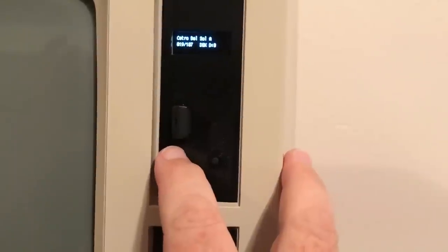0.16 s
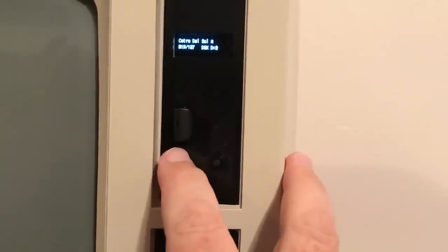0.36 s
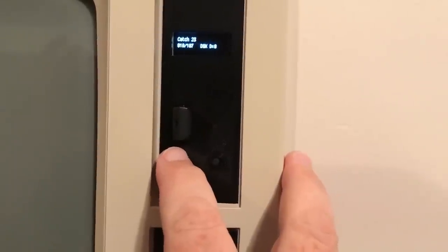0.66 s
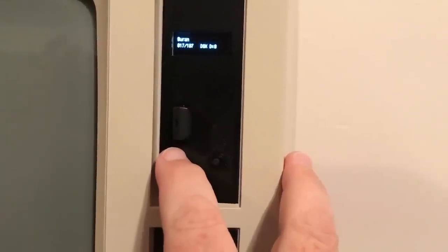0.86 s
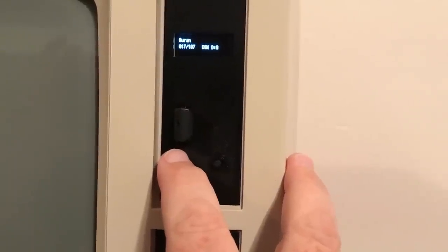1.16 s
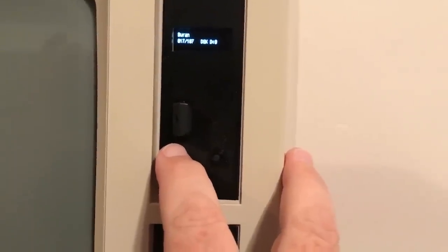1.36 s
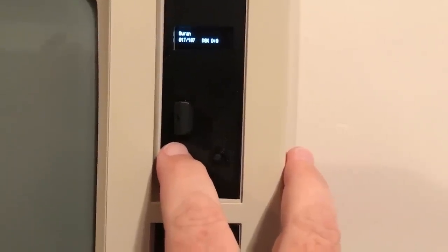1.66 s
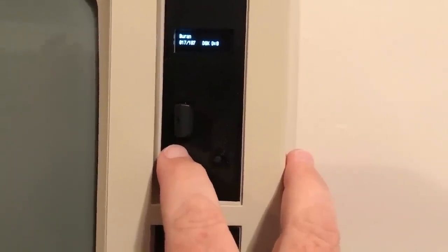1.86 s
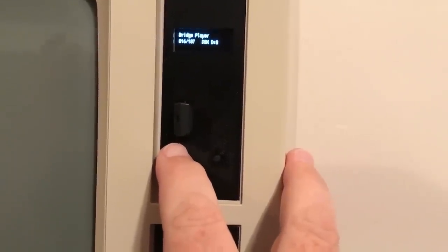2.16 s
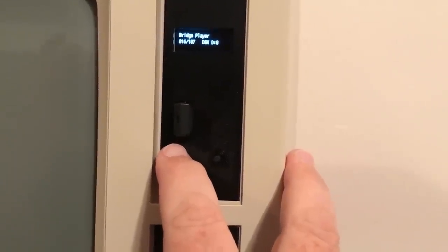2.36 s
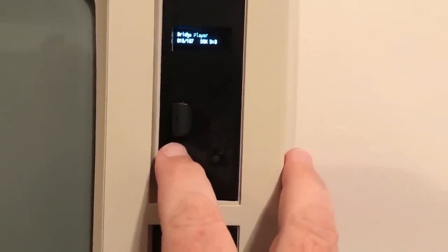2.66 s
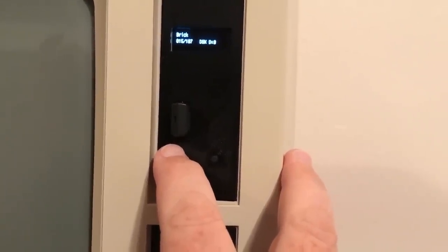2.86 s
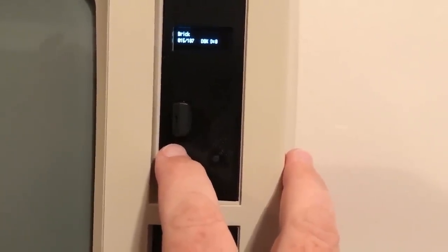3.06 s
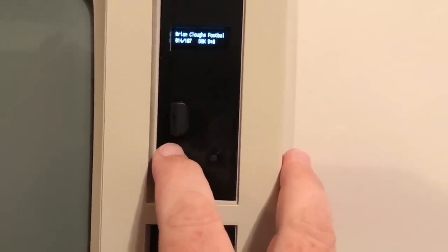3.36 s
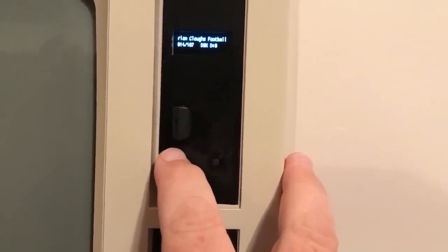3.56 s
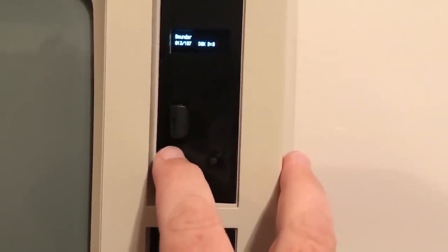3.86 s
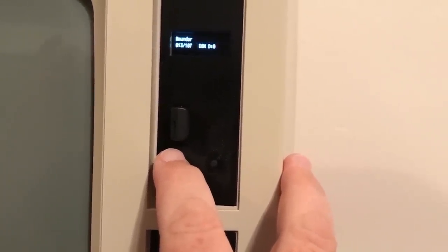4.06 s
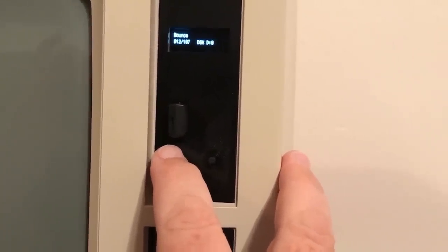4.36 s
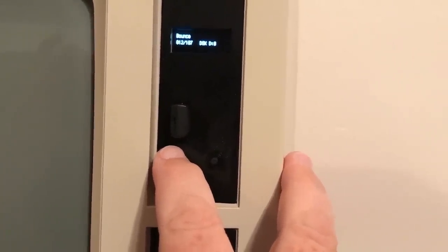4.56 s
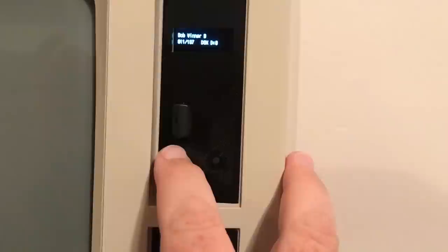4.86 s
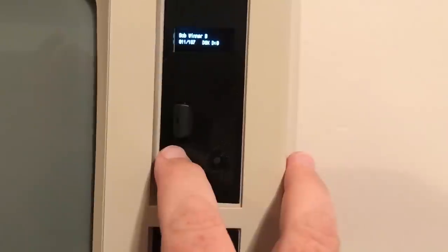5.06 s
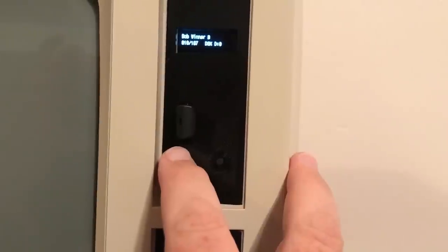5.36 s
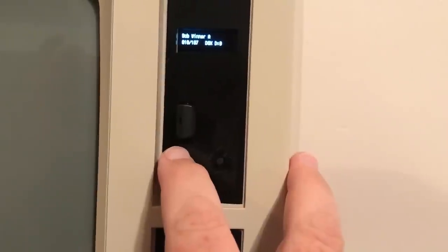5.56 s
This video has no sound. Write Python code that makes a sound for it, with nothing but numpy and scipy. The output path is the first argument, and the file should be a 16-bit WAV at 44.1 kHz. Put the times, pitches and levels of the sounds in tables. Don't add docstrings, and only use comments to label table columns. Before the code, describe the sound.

Crisp paired button clicks knock a hollow plastic panel, with irregular pauses, above soft rumble, faint hiss and a very high steady whine.

```python
import sys
import numpy as np
from scipy import signal
from scipy.fft import rfft, irfft
from scipy.io import wavfile
from scipy.ndimage import uniform_filter1d

SR = 44100
rng = np.random.default_rng(int(sys.argv[2]) if len(sys.argv) > 2 else 0)


def decibels_to_gain(level_db):
    exponent = np.asarray(level_db, float) / 20
    return 10 ** exponent


def wav_record(signal):
    frames = np.transpose(np.atleast_2d(signal))
    bounded = np.clip(frames, -1, 1)
    quanta = np.round(bounded * 32767).astype(np.int16)
    wavfile.write(sys.argv[1], SR, quanta)


N = 251811


def curve(table):
    return np.interp(np.arange(N) / SR, *np.transpose(table))


def colour(x, points):
    hz, db = np.transpose(points)
    bins = np.fft.rfftfreq(x.shape[-1], 1 / SR) + 1
    gain = decibels_to_gain(np.interp(np.log(bins), np.log(hz), db))
    return irfft(rfft(x) * gain, x.shape[-1])


def fade(t, t60):
    return 1000. ** (-t / np.maximum(t60, 1e-3))


def walk(rate):
    hold = int(SR / rate)
    steps = np.repeat(rng.standard_normal(N // hold + 1), hold)
    return 1.38 * uniform_filter1d(uniform_filter1d(steps, hold), hold)[:N]


def hiss(shape):
    noise = colour(rng.standard_normal(N), shape)
    return noise / np.std(noise)


# (frequency [Hz], level [dB per Hz])
RUMBLE_COLOUR = [(12, -81), (20, -52), (36, -14), (76, 0), (107, -5.5), (140, -3), (179, -9), (199, -35),
                 (231, -20), (260, -24.5), (340, -59), (570, -120)]
# (frequency [Hz], level [dB per Hz])
AIR_COLOUR = [(120, -23), (200, 1), (230, -1.5), (365, -3.5), (421, -9), (700, -8), (929, -10.5),
              (1010, -7.5), (1190, -10), (1900, -18), (2470, -38), (4180, -120)]
# (frequency [Hz], level [dB])
HISS_COLOUR = [(1500, -32), (1900, -6.5), (2350, -1), (3200, 2), (3700, -1), (4400, -4), (5300, -2),
               (6500, -7), (7200, -4), (8200, -8.5), (9300, -4.5), (10400, -13.5), (11400, -8),
               (15200, -6.5)]
RUMBLE_DB, AIR_DB, HISS_DB = -44, -55, -61
FAN_HZ = 84.24
FAN_PEAK_DB, FAN_PEAK_S, FAN_RISE_DB_S, FAN_FALL_DB_S = -44.5, 1.2, 5, 5


def floor():
    since = np.arange(N) / SR - FAN_PEAK_S
    swell_db = FAN_PEAK_DB + np.minimum(FAN_RISE_DB_S * since, -FAN_FALL_DB_S * since)
    fan = hiss([(0.84 * FAN_HZ, -90), (FAN_HZ, 0), (1.2 * FAN_HZ, -90)]) * decibels_to_gain(swell_db)
    rumble = hiss(RUMBLE_COLOUR) * decibels_to_gain(RUMBLE_DB + 0.26 * walk(4.1))
    air = hiss(AIR_COLOUR) * decibels_to_gain(AIR_DB)
    low_air = signal.sosfiltfilt(signal.butter(4, 600, fs=SR, output="sos"), air)
    high_air = air - low_air
    flicker = low_air * decibels_to_gain(1.9 * walk(4.1)) + high_air * decibels_to_gain(0.7 * walk(5.14))
    return fan + rumble + flicker + hiss(HISS_COLOUR) * decibels_to_gain(HISS_DB)


# (time [s], level [dB])
WHINE_SWAY = [(0.0, -46), (0.32, -44.5), (1.57, -48), (3.16, -46), (3.2, -44), (3.69, -50.5), (3.8, -46),
              (4.01, -52), (4.17, -52), (4.33, -46), (4.58, -45.5), (4.69, -48), (4.8, -44), (5.68, -43.5),
              (5.71, -46)]
# (frequency [Hz], level [dB])
SKIRT_COLOUR = [(14900, -100), (15250, -40), (15400, -14), (15550, 3), (15625, 20), (15720, -4),
                (15780, -22), (16200, -100)]
# (frequency [Hz], level [dB])
SUPPLY_TONES = [(11725, -64), (7826, -76), (12877, -86)]
LINE_HZ = 15625
WHINE_DB, SKIRT_DB = 4.5, -59


def tube():
    t = np.arange(N) / SR
    line = np.sqrt(2) * np.sin(2 * np.pi * LINE_HZ * t)
    whine = line + decibels_to_gain(SKIRT_DB + 45) * hiss(SKIRT_COLOUR)
    out = decibels_to_gain(curve(WHINE_SWAY) + WHINE_DB + 0.47 * walk(30)) * whine
    for hz, db in SUPPLY_TONES:
        waver_db = np.clip(walk(4.7), -1, 1)
        out = out + np.sqrt(2) * decibels_to_gain(db + waver_db) * np.sin(2 * np.pi * hz * t)
    return out


ROOM_T60_S, ROOM_DB = 0.29, -22


def room(x):
    t = np.arange(SR // 2) / SR
    noise = rng.standard_normal((2, len(t)))
    low_colour = [(150, -3.0), (600, -3.5), (1500, -0.5), (4000, -15)]
    high_colour = [(800, -37), (3500, -4.0), (4500, 0.5), (5500, -5.5),
                   (7400, -3), (10000, -9.0), (14000, -21)]
    low = colour(noise[0], low_colour) * fade(t, ROOM_T60_S)
    high = colour(noise[1], high_colour) * fade(t, 0.7 * ROOM_T60_S)
    onset = np.clip((t - .006) / 0.00067, 0, 1)
    tail = (low + decibels_to_gain(2.0) * high) * onset
    return signal.fftconvolve(x, tail * decibels_to_gain(ROOM_DB - 14.5))[:N]


# (delay [ms], gain for the tick [ratio], gain for the crack [ratio])
NEAR_ECHOES = [(1.15, 0.048, -1.87), (2.5, -1.2, 1), (3.1, -1.3, -1.1), (4.05, -0.38, 1), (5.0, 0.96, -1.4),
               (5.6, 0.85, 1), (7.1, 0.99, 0.87), (7.6, -1.4, 0.95)]
LEAD = 128


def arrivals(size, gains, spray_db, spray_t60):
    t = np.arange(size) / SR
    path = decibels_to_gain(spray_db) * rng.standard_normal(size) * fade(t, spray_t60)
    late = (np.array(NEAR_ECHOES)[:, 0] * SR / 1000).astype(int)
    path[late] += np.clip(gains, -.8, .8) * fade(t[late], spray_t60)
    return np.roll(path, LEAD)


def ring(t, hz, size, t60):
    return np.sum(size * np.sin(2 * np.pi * hz * t[:, None]) * fade(t[:, None], t60), axis=1)


# (time [s], case knock [dB], panel tick [dB], dome crack [dB])
PRESS_SNAPS = [(.0330, -17, -33, -17.5), (0.3802, -17, -37.5, -17), (0.7029, -15.5, -37, -15.5),
               (1.0600, -16, -35, -16), (2.0401, -14.5, -24.5, -13), (2.6206, -16, -33.5, -15),
               (3.1550, -16, -27.5, -14), (3.7029, -16.5, -35.5, -18), (4.2472, -15, -34.5, -14.5),
               (4.77, -15, -32, -14), (5.3170, -15.5, -37.5, -16.5)]
# (time [s], case knock [dB], panel tick [dB], dome crack [dB])
RELEASE_SNAPS = [(0.1592, -35, -41.5, -24.5), (0.4815, -15.5, -31.5, -18), (.8040, -16.5, -37.5, -28.5),
                 (1.1571, -16.5, -33.5, -29), (1.7812, -49, -51, -54), (2.1653, -31, -33, -11.5),
                 (2.7382, -15.5, -30, -20), (3.8139, -15.5, -31.5, -17), (4.3587, -16.5, -34, -26),
                 (4.8870, -16, -31, -22.5), (5.4219, -16.5, -35, -38)]
# (frequency [Hz], signed amplitude [1 = strongest], t60 [s])
CASE_MODES = [(217.6, -0.015, 0.3), (242, -0.087, 0.13), (409.2, -0.14, 0.1), (414.2, -0.038, 0.19),
              (441, -0.19, 0.1), (500, 0.92, 0.013), (527, 0.028, 0.273), (590.7, -0.084, 0.079),
              (637.6, -0.18, 0.038), (672, -0.058, 0.273), (736.5, -0.079, 0.056), (797.4, 0.032, 0.16),
              (847, -0.037, 0.059), (899, -0.11, 0.064), (1000, -0.14, 0.021), (1142, -0.028, 0.13),
              (1252, 0.006, 0.273), (1490, 0.014, 0.17), (1517, 0.022, 0.073), (1598, 0.056, 0.045),
              (1895, -0.0615, 0.037), (2054, -0.0193, 0.097)]
# (frequency [Hz], level [dB])
TICK_COLOUR = [(1400, -50), (2050, -20), (2350, -11), (2650, -4), (2900, -3), (3300, 0), (3650, -2),
               (4000, -8), (4350, -19), (5500, -50)]
# (frequency [Hz], level [dB])
CRACK_COLOUR = [(3000, -50), (4400, -15), (4800, -8), (6000, -5), (7000, -9), (8500, -6), (9400, -4),
                (10200, -7), (11000, 0), (12200, -9), (13000, -1), (13600, -8), (14300, -19), (15300, -11)]
# (knock hardness [dB per octave], top treble [dB])
PRESS_TOUCH, RELEASE_TOUCH = (-1, 1.6), (.12, 0.23)


def button():
    out = np.zeros(N + SR)
    t = np.arange(SR // 4) / SR
    hz, size, t60 = np.transpose(CASE_MODES)
    t60 = np.minimum(t60, 120 / hz)
    direct = np.roll(signal.unit_impulse(4096), LEAD)
    tick_path = arrivals(len(direct), np.array(NEAR_ECHOES)[:, 1], -19.0, 0.032)
    crack_path = arrivals(len(direct), np.array(NEAR_ECHOES)[:, 2], -15, .019)
    strokes = ((1, 0.00045, PRESS_TOUCH, PRESS_SNAPS),
               (-1.08, .0004, RELEASE_TOUCH, RELEASE_SNAPS))
    for way, lag_s, (hard_db, bright_db), snaps in strokes:
        for s, knock_db, tick_db, crack_db in snaps:
            finger_db = 0.77 * rng.standard_normal(len(hz))
            shares = size * decibels_to_gain(hard_db * np.log2(hz / 500) + finger_db)
            i = int(s * SR)
            out[i:i + len(t)] += way * decibels_to_gain(knock_db + 5.5) * ring(t, hz, shares, t60)
            j = i + int(lag_s * SR) - LEAD
            layers = ((tick_path, TICK_COLOUR, tick_db), (crack_path, CRACK_COLOUR, crack_db))
            for path, shape, db in layers:
                varied = path * decibels_to_gain(3.0 * rng.standard_normal(len(path)))
                spread = colour(varied, [(6500, 0), (10000, -7)])
                sound = colour(direct + spread, shape)
                sound = colour(sound, [(7000, 0.0079), (10500, bright_db)])
                out[j:j + len(path)] += way * decibels_to_gain(db) * sound / np.abs(sound).max()
    return out[:N]


def scene():
    clicks = button()
    return (clicks + room(clicks) + tube() + floor())[None]


def band_limit(x):
    return signal.sosfilt(signal.butter(12, 17160, fs=SR, output="sos"), x)


# (low edge [Hz], high edge [Hz], level over the usual needed to survive [dB])
TREBLE_GATES = [(12050, 12400, -2.2), (12400, 12580, -1.6), (12580, 12750, -1.6), (12750, 12930, -1.8),
                (12930, 13100, -1.2), (13100, 13780, 2.0), (13780, 15150, 3), (15150, 15330, 1.5)]
TOP_HZ = 15870


def record(dry):
    hz, _, frames = signal.stft(dry, SR, nperseg=2048, noverlap=1024)
    for lo, hi, keep_db in TREBLE_GATES:
        band = (hz >= lo) & (hz < hi)
        loud = np.sqrt(np.mean(np.abs(frames[:, band]) ** 2, axis=1, keepdims=True))
        frames[:, band] *= loud > decibels_to_gain(keep_db) * np.median(loud)
    frames[:, hz > TOP_HZ] = 0
    thinned = signal.istft(frames, SR, nperseg=2048, noverlap=1024)[1][:, :N]
    return band_limit(thinned)


dry = scene()
out = record(dry)
wav_record(out)
```